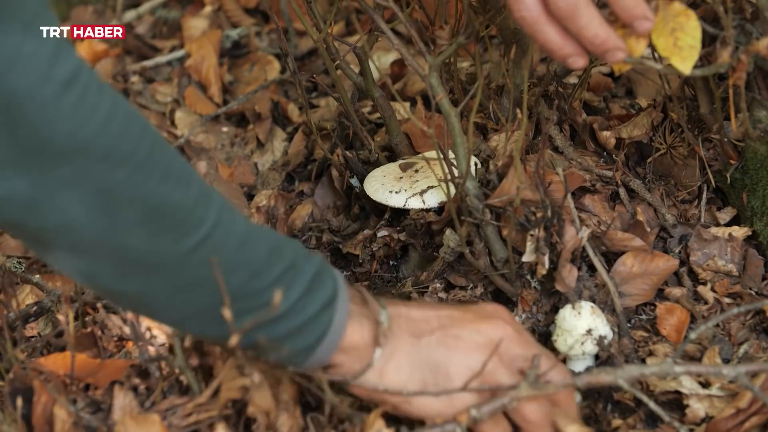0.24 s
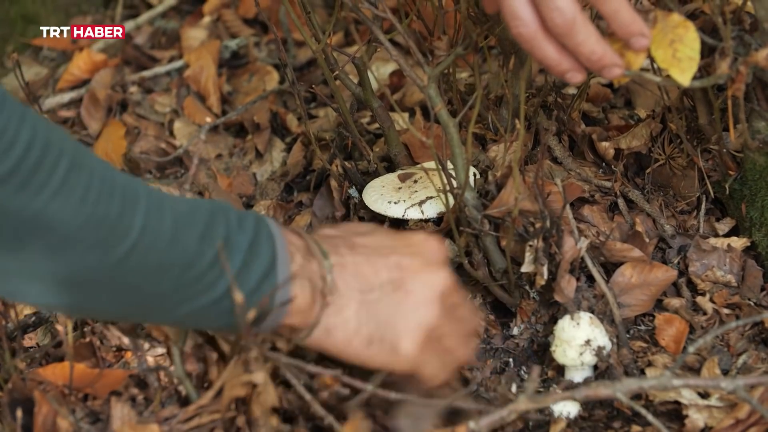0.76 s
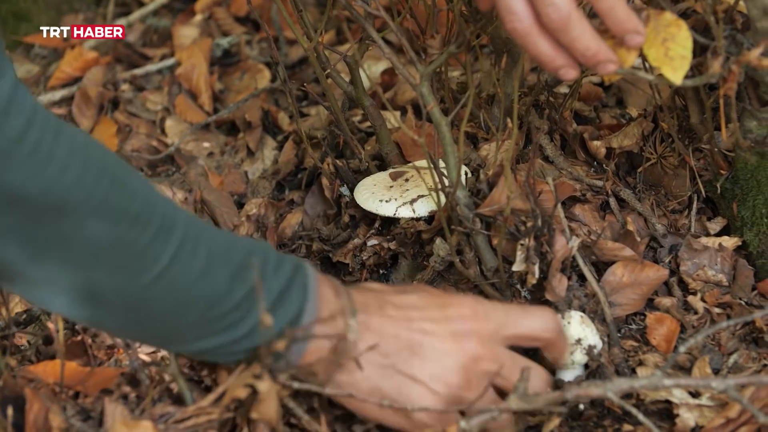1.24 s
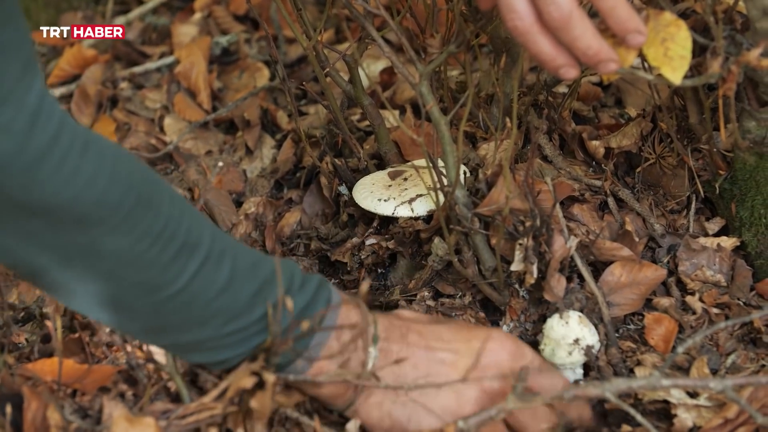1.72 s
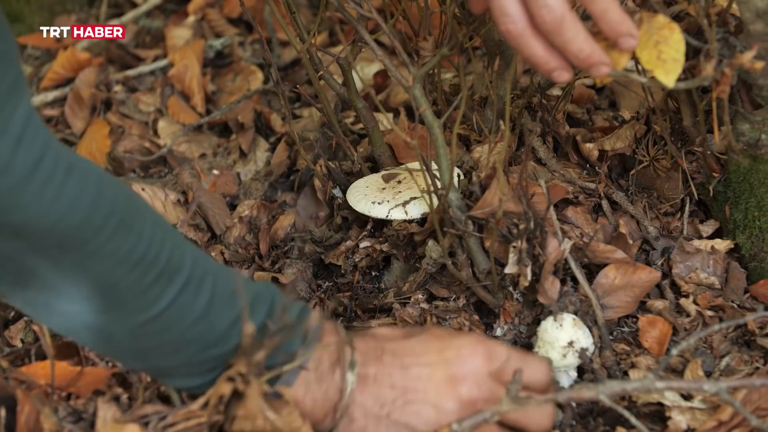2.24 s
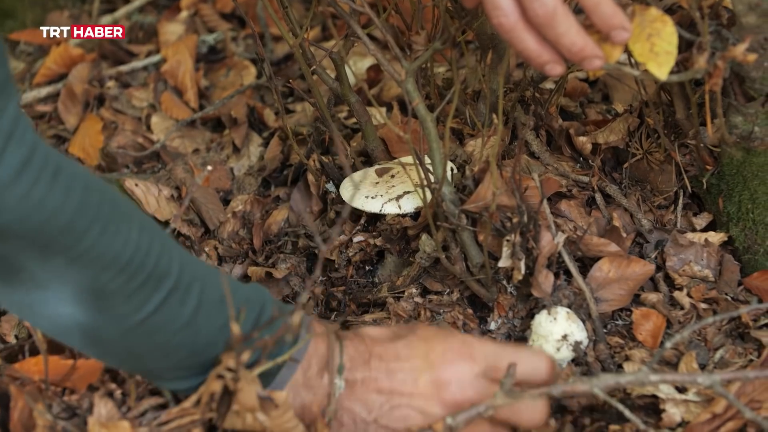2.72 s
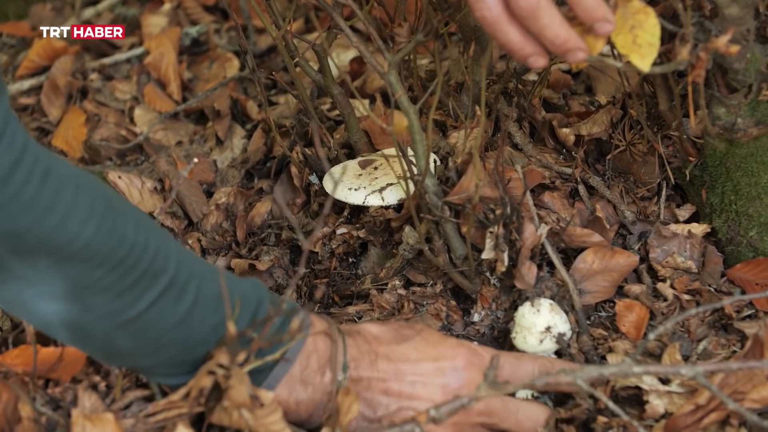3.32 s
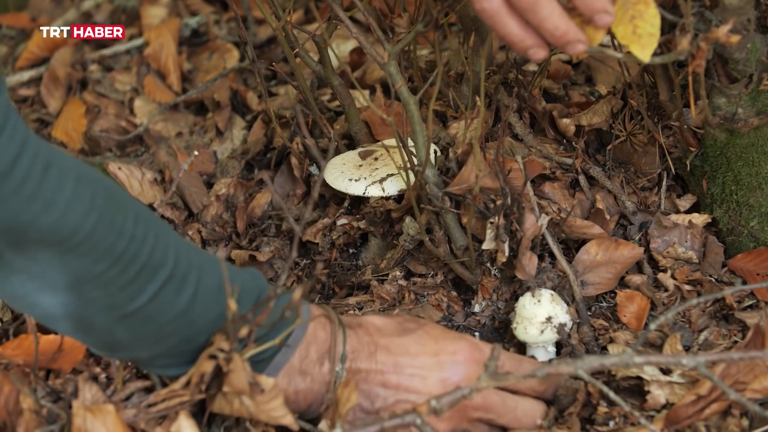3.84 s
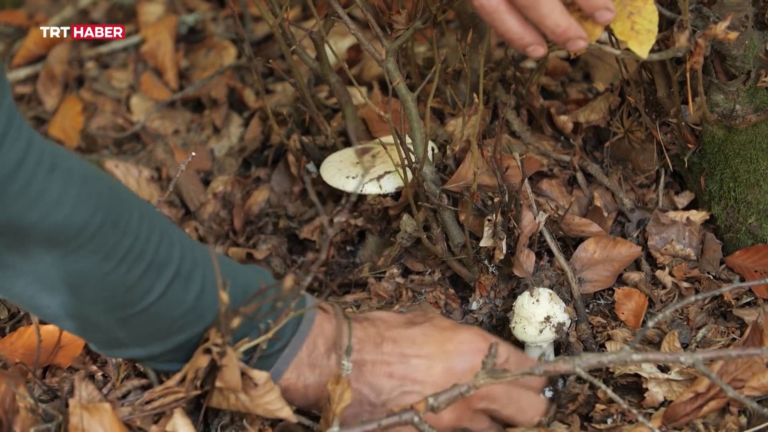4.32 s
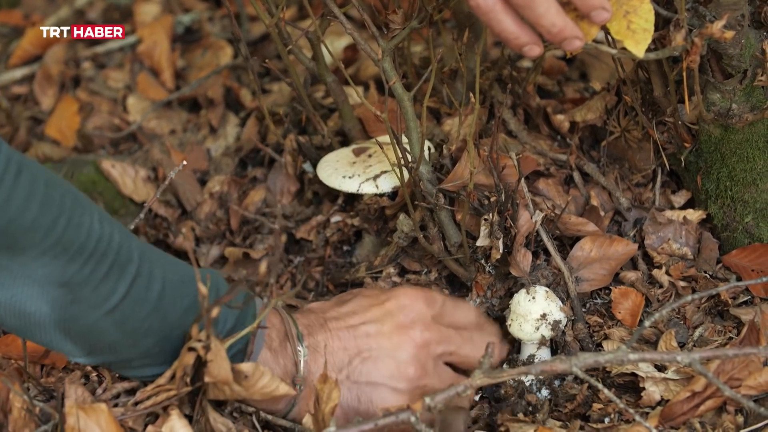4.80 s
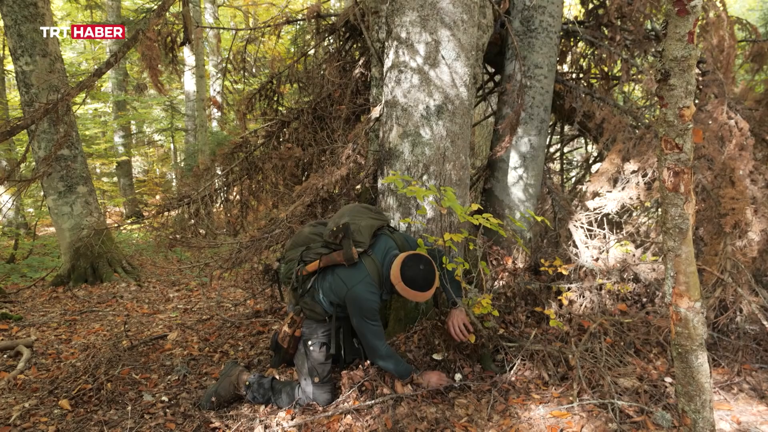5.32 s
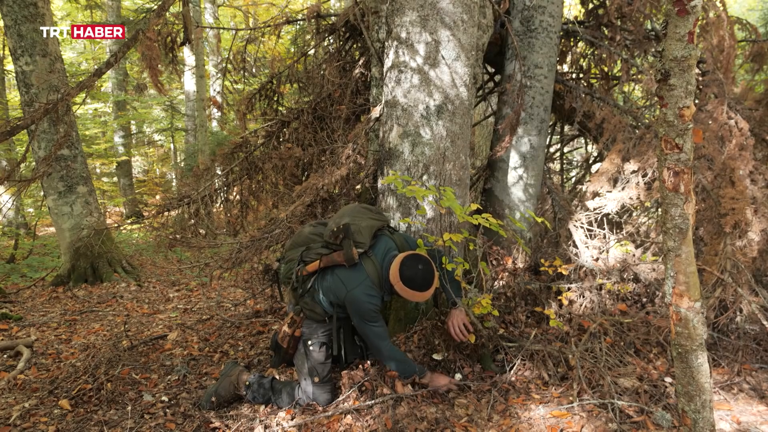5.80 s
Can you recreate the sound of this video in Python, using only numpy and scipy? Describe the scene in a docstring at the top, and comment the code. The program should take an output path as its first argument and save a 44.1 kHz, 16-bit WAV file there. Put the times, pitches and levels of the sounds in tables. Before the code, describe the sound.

A hand moves dry fallen leaves close by on a quiet forest floor. From the start to about 1.2 seconds, wide sweeps make a crisp rustle and scrape, dotted with brittle snaps and soft, damped thuds on the soil. The movement then eases into smaller pinches and short crinkles. At about 2.3 seconds a handful is crushed in a brief, louder crunch, ending in a sharp crack near 2.4 seconds, the loudest moment. Light, scattered crinkles and ticks follow, with short lulls, until about 4.2 seconds. The picking then grows busier, with a cluster of snaps around 4.4 to 4.8 seconds and a few faint bumps, and gentle rustling continues to the end at about 6 seconds. Faint forest air and a thin hiss lie underneath throughout, while a low rumble grows slowly from about 1.6 seconds.

```python
"""Clearing dry leaves by hand

A hand close by uncovers a mushroom, first with wide sweeps, then with small pinches. Stick-slip
friction makes the leaves scrape and crinkle. Brittle ribs fracture and set their leaves ringing,
and one handful is crushed, ending in a sharp crack. Now and then the hand bumps the soil with a
damped thud. A low rumble slowly grows behind the quiet forest air."""
import sys
import numpy as np
from scipy import signal
from scipy.fft import rfft, irfft, next_fast_len
from scipy.io import wavfile
from scipy.ndimage import map_coordinates

SR = 44100
rng = np.random.default_rng(int(sys.argv[2]) if len(sys.argv) > 2 else 0)


def log_audio(samples):
    """Write samples as a 16-bit WAV file to the path given in sys.argv[1]."""
    # one column per channel
    frames = np.atleast_2d(samples).T
    # limit to full scale, then quantise
    limited = np.clip(frames, -1, 1)
    pcm = np.round(limited * 32767).astype(np.int16)
    wavfile.write(sys.argv[1], SR, pcm)


N = 266981
TIME = np.arange(N) / SR
TOP_HZ = 15850


def amp(db):
    """Amplitude ratio of a level: a factor of ten per 20 dB."""
    return 10 ** (np.asarray(db) / 20)


def unit(x):
    """Normalisation to unit RMS."""
    return x / np.sqrt(np.mean(x ** 2) + 1e-20)


def wobble(rate):
    """Spline interpolation of random knots, rate per second, gives a smooth fluctuation."""
    return map_coordinates(rng.standard_normal(int(N * rate / SR) + 4), [TIME * rate])


def coloured(x, points):
    """Minimum-phase filtering: a causal response whose gain follows the (f/Hz, gain/dB) points."""
    size = 2 * next_fast_len(len(x))
    hz, db = np.transpose(points)
    gain = amp(np.interp(np.log(np.fft.rfftfreq(size, 1 / SR) + 1), np.log(hz), db))
    cepstrum = irfft(np.log(np.maximum(gain, 1e-5)))
    cepstrum[1:size // 2] *= 2  # fold onto positive time
    cepstrum[size // 2 + 1:] = 0
    return irfft(rfft(x, size) * np.exp(rfft(cepstrum)))[:len(x)]


def ringing(x, hz, q):
    """Forced response of one damped resonator."""
    return signal.lfilter(*signal.iirpeak(hz, q, fs=SR), x)


def add(track, start, sound):
    """Superposition: a sound joins the track at start seconds."""
    part = track[max(round(start * SR), 0):][:len(sound)]
    part += sound[:len(part)]


# Spectra of the forest air and of the rumble: f/Hz, gain/dB
AIR_SPECTRUM = [(88, -29), (150, 7.5), (209, -4.5), (249, -10), (368, -7.5), (439, -6), (514, -8),
                (2220, -32), (4410, -45), (16000, -28.5)]
RUMBLE_SPECTRUM = [(15, -28), (35, -3), (55, -13), (76, 2.5), (100, -5.5), (125, -11.5), (150, -27),
                   (195, -34.5), (300, -33), (600, -86)]
def forest():
    """Filtered Gaussian noise: steady air, a thin hiss and a rumble that grows exponentially."""
    hiss_spectrum = [(1500, -7), (3000, 3), (6000, -9), (12000, 1), (16000, -7)]
    air = amp(-65.5) * unit(coloured(rng.standard_normal(N), AIR_SPECTRUM))
    hiss = amp(-66.5) * unit(coloured(rng.standard_normal(N), hiss_spectrum))
    rumble_db = -57 + 3 * np.maximum(TIME - 1.58, 0)  # 3 dB/s from 1.58 s on
    rumble = amp(rumble_db) * unit(coloured(rng.standard_normal(N), RUMBLE_SPECTRUM))
    return air + hiss + rumble


# The hand meeting soil and buried twigs: t/s, level/dB, f/Hz
SOIL_IMPACTS = [(0.143, -38.5, 139), (0.234, -49, 724), (0.76, -49.5, 750), (.934, -50.5, 602),
                (1.108, -48.5, 1150), (1.587, -54, 950), (4.241, -53.5, 1140), (4.398, -53, 392),
                (5.163, -52.5, 1170)]
def bumps():
    """Heavily damped impact: soft ground gives a thud of a few cycles and a puff, duller if deeper."""
    track, t = np.zeros(N), np.arange(SR // 10) / SR
    for start, db, hz in SOIL_IMPACTS:
        cycles = hz * t
        thud = unit(np.sin(2 * np.pi * cycles) * (1 - np.exp(-cycles / 4.7)) * amp(-7 * cycles))
        dull_db = -5 * np.log2(1400 / hz)
        spectrum = [(60, -8), (min(2.6 * hz, 1300), 0), (1400, dull_db), (1850, dull_db - 11),
                    (5000, -60)]
        puff = unit(coloured(rng.standard_normal(len(t)), spectrum) * amp(-60 * t / 0.066))
        add(track, start, amp(db) * (amp(-7.5) * thud + amp(-10) * puff))
    return track


# Sweeping begins, is full, eases, has given way to pinching: t/s
SWEEP_TIMES = (0.0, 0.4, 1.15, 2.1)
def sweeping():
    """Power fraction, 0-1, of sweeping loose litter as against pinching single leaves."""
    return np.interp(TIME, SWEEP_TIMES, [0, 1, 1, 0])


def push(leaves):
    """Envelope detection: each burst of crackling brings a soft low push that swings back."""
    low_band = signal.butter(2, [22, 75], "band", fs=SR, output="sos")
    gain_db = 2.5 - 2 * sweeping()  # the push is weaker during sweeps
    return amp(gain_db) * signal.sosfilt(low_band, np.abs(leaves))


def gesture(start, length, db, attack_s, sag_db, release_s):
    """Envelope of one movement: linear attack, a sag over its length, then exponential decay."""
    t = TIME - start
    attack = np.clip(t / attack_s, 0, 1)
    hold = amp(db - sag_db * np.clip(t / length, 0, 1))
    return attack * hold * np.exp(-np.maximum(t - length, 0) / release_s)


# Strokes of the hand through the leaves: t/s, duration/s, level/dB
HAND_STROKES = [(-0.03, 0.1, -46), (0.049, 0.12, -43.5), (0.192, 0.069, -42), (0.278, 0.21, -45.5),
                (0.472, 0.33, -41.5), (0.823, 0.13, -41), (0.977, .14, -41), (1.158, 0.21, -48),
                (1.308, 0.21, -49.5), (1.56, 0.023, -45.5), (1.64, 0.043, -60), (1.709, 0.078, -50),
                (1.77, 0.1, -47.5), (1.899, 0.14, -53.5), (2.083, 0.095, -51.5), (2.217, 0.078, -48),
                (2.274, 0.14, -47.5), (2.534, 0.14, -57.5), (2.697, 0.072, -53), (2.758, 0.064, -44.5),
                (2.859, 0.15, -52.5), (3.101, 0.071, -46.5), (3.308, .03, -60), (3.372, .05, -54),
                (3.555, 0.049, -51.5), (3.927, 0.3, -55), (4.218, 0.048, -52), (4.3, 0.017, -49.5),
                (4.411, 0.16, -46.5), (4.569, 0.024, -41.5), (4.64, 0.088, -52.5), (4.729, 0.067, -43.5),
                (4.845, 0.26, -48), (5.147, 0.058, -40.5), (5.257, 0.079, -47), (5.436, .16, -51),
                (5.634, 0.47, -46.5)]
def effort():
    """Incoherent sources add in power: the level in dB of all strokes and the resting hand's stir."""
    power = sum(gesture(*stroke, attack_s=0.024, sag_db=0.12, release_s=0.051) ** 2
                for stroke in HAND_STROKES)
    return 10 * np.log10(power + amp(-62) ** 2)


def fractures(rate, spread_db, life_s):
    """Acoustic emission: fibres break as a Poisson process, in noise bursts mostly small, a few large."""
    happens = rng.random(N) < rate / SR
    size = amp(spread_db * np.minimum(rng.standard_exponential(N), 3))
    power = signal.filtfilt([1], [1, -np.exp(-4 / (life_s * SR))], happens * size ** 2)
    return unit(np.sqrt(np.abs(power)) * rng.standard_normal(N))


def edge_flicks(rate, low_hz, octaves, cycles):
    """Free vibration: each flicked edge rings for a few cycles; small stiff ones are sharper."""
    when, size, height = rng.random((int(rate * N / SR), 3)).T
    hz = np.minimum(low_hz * 2 ** (octaves * height), TOP_HZ)[:, None]
    step = np.arange(SR // 200)
    phase = hz * step / SR
    strength = amp(19 * size ** 3)[:, None] * hz
    grains = strength * np.sin(2 * np.pi * phase) * phase * np.exp(-phase / cycles)
    samples = (when * N).astype(int)[:, None] + step
    return unit(np.bincount(samples.ravel(), grains.ravel(), N)[:N])


# Spectrum of the damp layer under the leaves: f/Hz, gain/dB
DAMP_SPECTRUM = [(110, -46.5), (180, -6), (416, 0), (455, -2), (688, 0.5), (953, -3.5), (1030, -2),
                 (1220, -0.5), (1610, -5.5), (1760, -10.5), (1900, -7.5), (2470, -43), (4180, -120)]
# How hard the fingers drag on that layer: t/s, gain/dB
FINGER_DRAG = [(0, 3), (1.2, 1), (2.2, -0.5), (3.7, -2), (5.1, 0.5), (6.05, 0.5)]
def scrape(friction, effort_db):
    """Friction on the damp layer: a dull noise that grows more slowly than the hand's effort."""
    drag_db = np.interp(TIME, *np.transpose(FINGER_DRAG))
    level_db = -55.5 + 0.69 * (effort_db + 48) + drag_db
    return amp(level_db) * unit(coloured(friction, DAMP_SPECTRUM))


# Spectra of loose litter (broad) and of a single leaf (hollow): f/Hz, gain/dB
LITTER_SPECTRUM = [(1000, -30.5), (1950, -13.5), (2500, -8.5), (3450, -5.5), (4100, -6), (5000, -2),
                   (6200, -5), (7200, -7), (8300, -9), (9400, -14.5), (11300, -12.5), (16000, -17)]
LEAF_SPECTRUM = [(1000, -46), (1800, -14.5), (2300, -6.5), (3500, -2), (4400, -7), (5050, -2), (6100, -1.5),
                 (7500, -8.5), (8400, -7), (9500, -10), (10700, -9.5), (12200, -13.5), (13200, -12.5),
                 (16000, -15)]
def crinkle(sliding, pinching, effort_db):
    """Source and filter: friction and flicks excite litter and single leaves, mixed at equal power."""
    flicks = amp(-7.5) * edge_flicks(rate=300, low_hz=5400, octaves=1.38, cycles=1.3)
    loose = unit(coloured(sliding + amp(-10.5) * flicks, LITTER_SPECTRUM))
    single = unit(coloured(pinching + flicks, LEAF_SPECTRUM))
    sweep = sweeping()
    return amp(effort_db) * (np.sqrt(sweep) * loose + np.sqrt(1 - sweep) * single)


def rustle(effort_db):
    """Stick-slip friction: hiss and fibre breaks drive both layers, wavering as edges catch and let go."""
    catching = wobble(90)
    sliding = unit(rng.standard_normal(N) + amp(-1) * fractures(rate=700, spread_db=6.5, life_s=0.002))
    pinching = unit(rng.standard_normal(N) + fractures(rate=380, spread_db=4.5, life_s=0.0028))
    dry_layer = amp(0.54 * catching) * crinkle(sliding, pinching, effort_db)
    damp_layer = amp(0.92 * catching) * scrape(sliding + pinching, effort_db)
    return dry_layer + damp_layer


# The fist closing on a handful: t/s, duration/s, level/dB
SQUEEZE = (2.297, 0.098, -32)
# Spectrum of the handful: f/Hz, gain/dB
HANDFUL_SPECTRUM = [(150, -13), (600, -9.5), (1250, -7.5), (1850, -24), (2700, -7.5), (3650, -2),
                    (4600, -9), (5400, -4), (6150, 3), (7450, -14), (8100, -7.5), (9500, -12), (11100, -9),
                    (16000, -20)]
def crush():
    """Crumpling: in a closing fist, breaks and flicks overlap into one unbroken crunch."""
    breaks = fractures(rate=3000, spread_db=7.5, life_s=0.002)
    flicks = amp(-13.5) * edge_flicks(rate=720, low_hz=5040, octaves=1.05, cycles=1.7)
    envelope = gesture(*SQUEEZE, attack_s=0.0027, sag_db=6, release_s=0.019)
    return envelope * unit(coloured(breaks + flicks, HANDFUL_SPECTRUM))


# Spectra of a rib's crack and of its fine splinters: f/Hz, gain/dB
CRACK_SPECTRUM = [(150, -9.5), (600, -7), (1250, -5), (1850, -14.5), (2600, -5.5), (3600, 2), (4550, -5),
                  (5300, -7.5), (6100, 0.5), (7500, -4), (8200, 1.5), (9500, -7), (11100, -7.5),
                  (16000, -19.5)]
SPLINTER_SPECTRUM = [(5000, -35.5), (8000, 1.5), (11000, -7.5), (16000, -7)]
def snaps(ribs):
    """Brittle fracture: each rib strains, cracks and crumbles, driving its leaf's resonance."""
    track, t = np.zeros(N), np.arange(SR // 22) / SR
    strain_s = 0.008
    strain = np.minimum(t / strain_s, 1) ** 4
    after = np.maximum(t - strain_s, 0)
    for break_s, db, hz, crumble_db in ribs:
        burst, crumbs, sizes_db = rng.standard_normal((3, len(t)))
        t60 = 0.0084 * amp(0.73 * crumble_db)  # a clean break is over sooner
        crack = unit(np.tanh(2 * burst) * (1 - np.exp(-after / 0.00065)) * amp(-60 * after / t60))
        crumble = unit(crumbs * amp(sizes_db) * strain * amp(-60 * after / 0.036))
        force = crack + amp(crumble_db + 6.5) * crumble
        body = unit(coloured(force, CRACK_SPECTRUM))
        ring_db = -5 - 0.33 * crumble_db  # crumbling weakens the ring
        ring = amp(ring_db) * unit(ringing(ringing(force, hz, q=3.2), hz, q=3.2))
        splinter_db = -8 + 9.5 * np.log2(hz / 5500)  # stiffer ribs shed more
        splinters = amp(splinter_db) * unit(coloured(force, SPLINTER_SPECTRUM))
        add(track, break_s - strain_s, amp(db - 14.5) * np.std(force) * unit(body + ring + splinters))
    return track


# Spells in which lesser ribs give way: start t/s, end t/s, rate/(1/s), mean relative level/dB
SNAP_SPELLS = [(0.052, 1.2, 7.8, -38.5), (1.42, 2.05, 21.4, -39), (2.08, 3.599, 10, -44.5),
               (3.969, 5.251, 12.8, -41.5), (5.348, 6.051, 8, -45.5)]
def small_snaps(effort_db):
    """Fracture under load: lesser ribs break at random moments, louder the harder the hand works."""
    ribs = []
    for start, end, rate, mean_db in SNAP_SPELLS:
        count = max(round(rate * (end - start)), 1)
        jitter, size, stiffness = rng.random((count, 3)).T
        break_s = start + (end - start) * (np.arange(count) + jitter) / count
        force_db = np.interp(break_s, TIME, effort_db)
        db = mean_db + 0.49 * (force_db - force_db.mean()) + 1.5 * (2 * size - 1)
        hz = 6060 * 2 ** (0.35 * (2 * stiffness - 1))
        crumble_db = np.full(count, -12.5)
        ribs += zip(break_s, db, hz, crumble_db)
    return snaps(ribs)


# The loudest ribs breaking: t/s, relative level/dB, ring f/Hz, relative crumbling level/dB
RIB_BREAKS = [(.042, -32.5, 7200, -5), (0.2489, -30, 4400, -6), (.259, -23.5, 5430, -8.5),
              (.489, -35, 5400, -12), (.501, -32.5, 5270, -3.5), (.51, -33.5, 5460, -16),
              (.622, -31, 5300, -3.5), (0.7607, -35, 4160, 0), (.865, -28, 4670, -6.5),
              (.933, -24.5, 4330, -14), (1.051, -29.5, 4160, -6.5), (1.0644, -32, 7200, -5.5),
              (1.074, -29, 6600, -8), (1.106, -29, 5260, -6.5), (1.117, -37.5, 4800, -1.5),
              (1.145, -34.5, 5100, -17), (1.323, -32, 5430, -5), (1.4, -36.5, 11000, -11),
              (1.507, -33.5, 6400, -9), (1.548, -36.5, 4870, -9), (1.576, -33.5, 4200, -11),
              (1.586, -32.5, 7000, -9), (1.7091, -35.5, 5200, -6.5), (1.845, -35.5, 10000, -10),
              (2.0045, -38, 8260, -12), (2.029, -43, 10500, -8), (2.272, -38, 4060, 1),
              (2.276, -31.5, 5430, -7), (2.306, -31, 6060, 0), (2.349, -26.5, 5470, -6.5),
              (2.373, -30, 7500, -7), (2.38, -26, 5930, -9.5), (2.398, -36, 5800, -6),
              (2.431, -19.5, 5870, -17), (2.716, -41.5, 6100, -22), (2.779, -41, 5200, -7),
              (2.792, -37, 5540, 0), (3.194, -41.5, 6000, 0.5), (3.211, -34, 7100, -15),
              (3.627, -35, 5800, -8), (4.033, -34.5, 5850, -16.5), (4.181, -44, 5450, 0.5),
              (4.336, -46.5, 10500, -10), (4.404, -35, 5370, -6.5), (4.489, -35.5, 6170, -6),
              (4.538, -36.5, 5000, 1.5), (4.608, -30, 5600, -3.5), (4.62, -30, 5700, -6.5),
              (4.7762, -30.5, 5560, -8)]
def loud_snaps():
    """Sudden release of elastic energy: the loudest ribs break at set times, each with its own pitch."""
    return snaps(RIB_BREAKS)


def scene():
    """Linear superposition, in mono, of the leaves, a low push that follows their crackling, the soil and the
    forest."""
    effort_db = effort()
    leaves = rustle(effort_db) + crush() + loud_snaps() + small_snaps(effort_db)
    return (leaves + push(leaves) + bumps() + forest())[None]


def record(dry):
    """Band limiting: a linear-phase low-pass removes the treble above TOP_HZ."""
    return signal.fftconvolve(dry, signal.firwin(255, TOP_HZ, fs=SR)[None], "same", axes=1)


dry = scene()
out = record(dry)
log_audio(out)
```